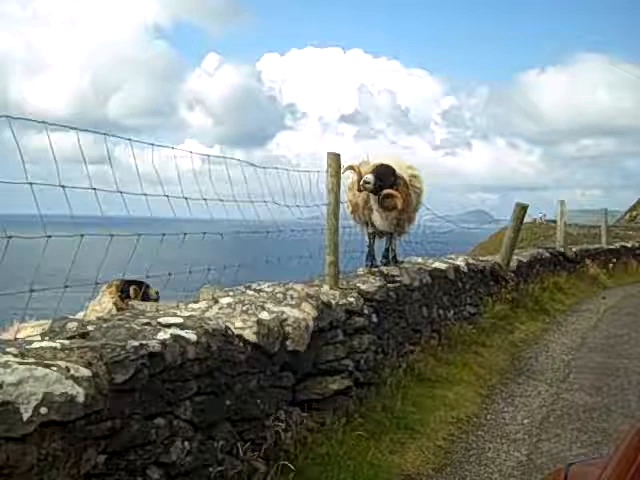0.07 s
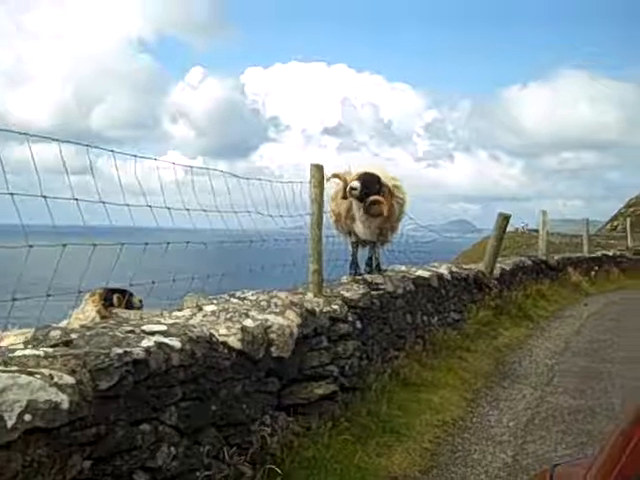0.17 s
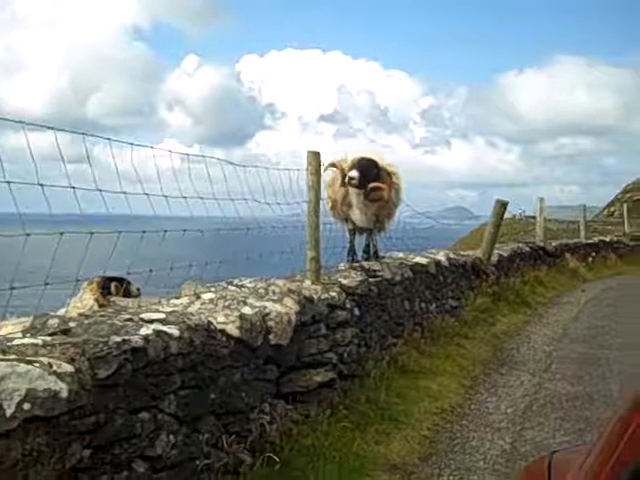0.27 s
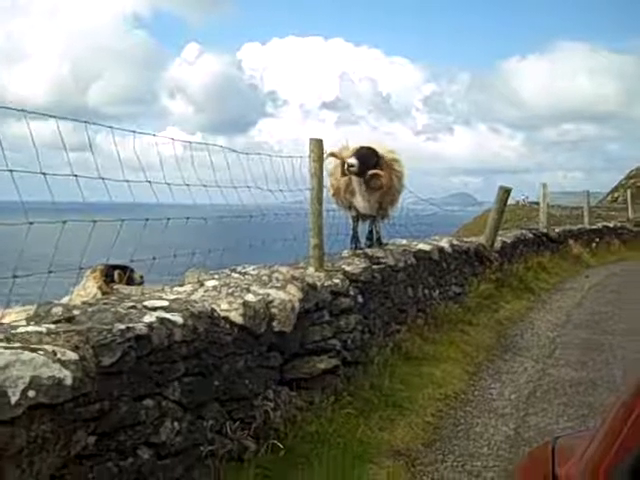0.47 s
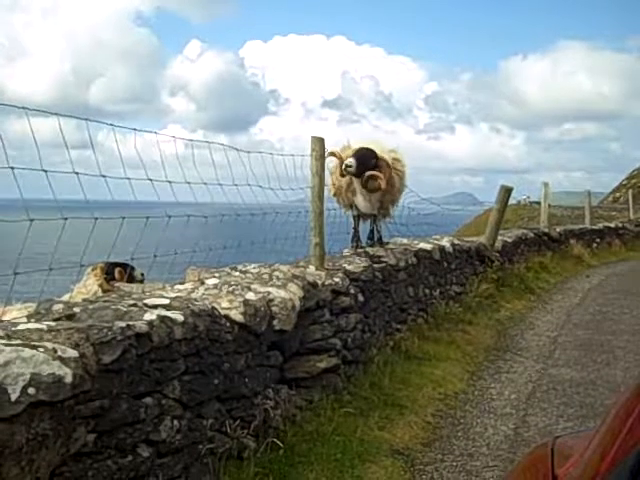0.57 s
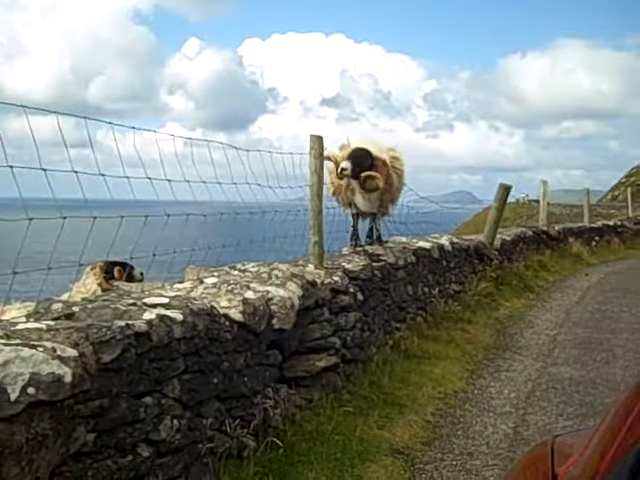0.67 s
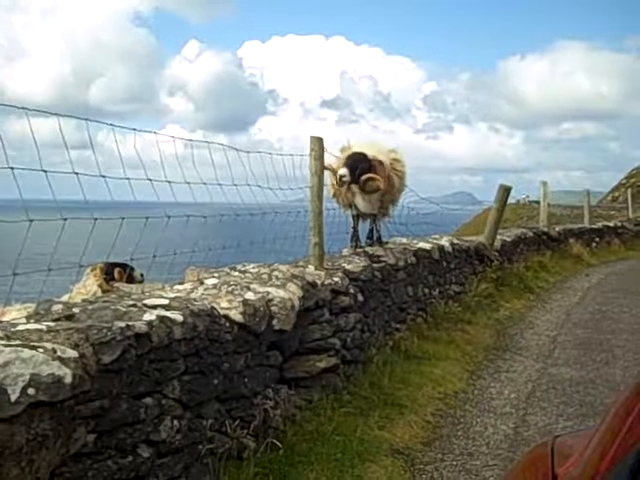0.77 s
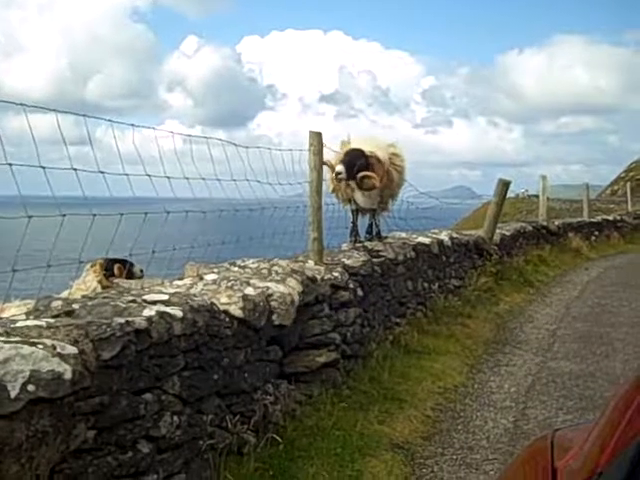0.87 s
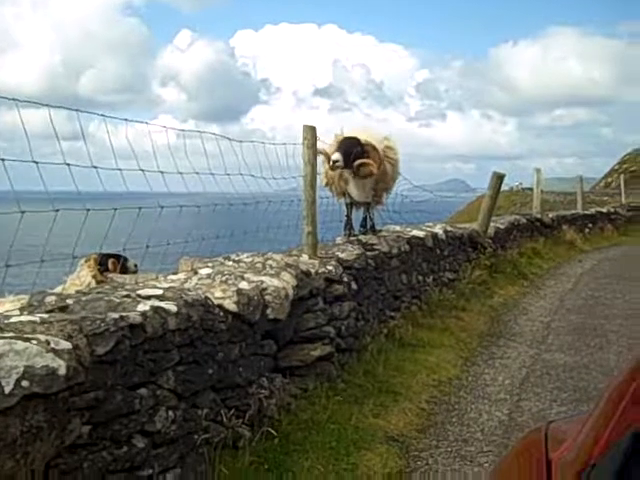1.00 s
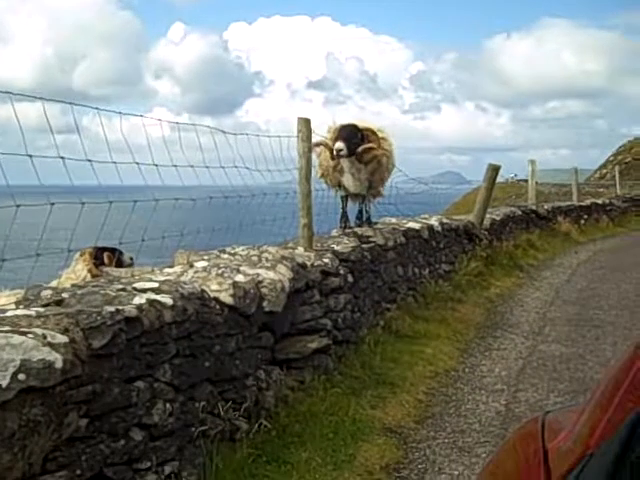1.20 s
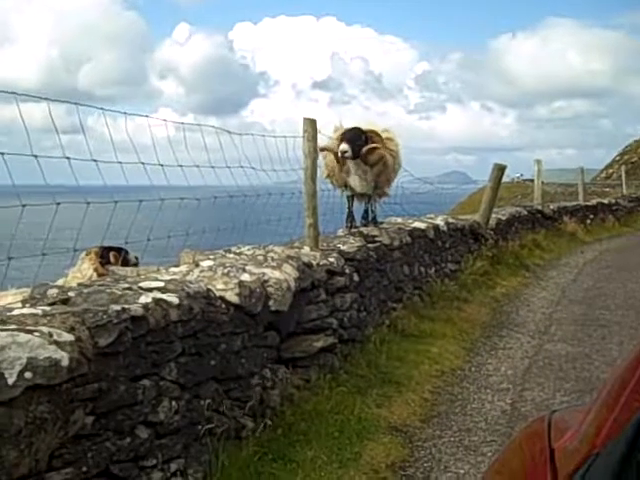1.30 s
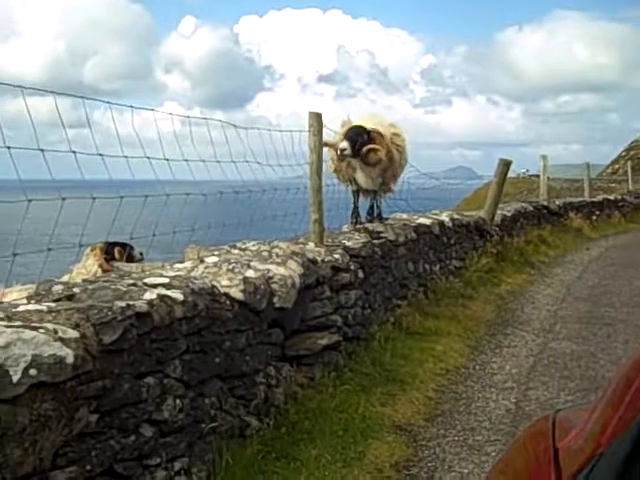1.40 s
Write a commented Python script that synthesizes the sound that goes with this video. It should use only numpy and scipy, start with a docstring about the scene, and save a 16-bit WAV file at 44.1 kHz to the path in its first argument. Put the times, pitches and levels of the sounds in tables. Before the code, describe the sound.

A wire fence ticks briefly as a sheep rubs it, over soft wind and sea.

```python
"""On a road above the sea, heard from a stopped car, a sheep rubs on a wire fence.
The wire slips at its post and rings very briefly, giving three dry ticks.
Small gusts and swirls of air flutter against the microphone, which opens with a soft pop.
Behind them is a steady wash of sea and air, with a faint hum and a faint high chirr."""
import sys
import numpy as np
from scipy import signal
from scipy.fft import rfft, irfft
from scipy.io import wavfile
from scipy.ndimage import uniform_filter1d

SR = 44100
rng = np.random.default_rng(int(sys.argv[2]) if len(sys.argv) > 2 else 0)


def bounce(signal):
    """Save signal as a 16-bit WAV file at the path given by the first command-line argument."""
    frames = np.transpose(np.atleast_2d(signal))
    limited = np.clip(frames, -1, 1)
    pcm = np.round(limited * 32767).astype(np.int16)
    wavfile.write(sys.argv[1], SR, pcm)


N = 63945
T, HZ = np.arange(N) / SR, np.fft.rfftfreq(N, 1 / SR)

# The ticks of the fence. Each row: start in seconds, level in dB, ring time factor, pitch factor,
# treble tilt in dB per octave, scrape level in dB, rebound level in dB.
FENCE_TICKS = [(0.2834, -33.1, 0.42, 0.965, -2.3, -2, -19), (1.163, -36.5, 0.29, 0.93, 1.3, 9.5, -20),
               (1.1859, -28, 0.87, 1, -1.2, -12, -11)]
# The wire's ringing tones, before each tick adjusts them.
# Each row: pitch in Hz, level in dB, seconds to fade by 60 dB.
WIRE_TONES = [(1000, -19, 0.0092), (1450, 0, 0.011), (1650, -13, 0.0078), (2290, -13, 0.018),
              (2580, -5, .0115), (3200, -6.5, 0.012), (4900, -7, 0.01), (5380, -3.5, 0.011),
              (7020, -13, 0.0096), (7290, 3, .0102), (7815, 1.5, 0.0094), (10100, -11.5, 0.0081),
              (12150, -16, .0046), (14700, -17.8, .0048)]
# Swirls of air hitting the microphone. Each row: time in seconds, level in dB, centre pitch in Hz.
AIR_EDDIES = [(0.3133, -39, 179), (0.327, -32, 533), (0.3312, -28, 167), (0.3608, -40, 150),
              (0.3788, -37.5, 155), (0.394, -40, 340), (.4162, -42, 400), (.4545, -40, 150),
              (0.493, -42, 159), (0.5139, -41.5, 175), (.5467, -30.5, 217), (.5535, -35.5, 513),
              (.5718, -31.5, 358), (.5768, -25.5, 490), (.5791, -24.5, 370), (.5828, -45, 420),
              (0.6041, -32, 308), (.6087, -33.5, 480), (0.6132, -28.5, 207), (0.8157, -36.5, 165),
              (0.8553, -28, 215), (0.8676, -32, 710), (0.8741, -49, 178), (.8837, -22.5, 494),
              (.8847, -21.5, 212), (0.8869, -32, 514), (0.9498, -40.5, 166), (0.9841, -44.2, 203),
              (1.1258, -42.5, 259), (1.1477, -41.5, 148), (1.1636, -40, 130), (1.187, -39.5, 137),
              (1.4093, -37.5, 248)]
# Puffs of wind. Each row: peak time, rise and fall in seconds, level in dB, centre pitch in Hz.
WIND_GUSTS = [(.347, 0.02, .031, -45.5, 93), (.487, .04, 0.033, -53.5, 102),
              (.576, .023, 0.034, -42.5, 185), (0.819, 0.01, 0.0082, -45, 125),
              (.867, 0.016, .029, -43.5, 172), (1.152, 0.034, 0.039, -53, 119),
              (1.3, 0.032, 0.037, -57, 78), (1.427, 0.019, 0.021, -53.5, 94)]
# The tone colour of sea and air. Each row: frequency in Hz, relative level in dB.
WASH_SPECTRUM = [(25, -1.5), (100, -2), (200, -2), (360, -3), (800, 0), (1500, -5), (2600, -3.5),
                 (4600, -14), (6300, -13.5), (9000, -16), (12500, -22), (15500, -30.5), (16100, -59)]
# Narrow peaks that make the wash hum. Each row: pitch in Hz, width in Hz, boost in dB.
HUM_PEAKS = [(542, 42, 3), (720, 48, 1.5), (771, 18, 10.5), (920.6, 34.5, 9.5), (1130, 73, 5.5),
             (2198, 63, 4.5), (2597, 22, 5.5)]


def wire_tick(db, ring, pitch, tilt_db, scrape_db, rebound_db):
    """The wire slips with a tiny scrape, rings very briefly and rebounds once."""
    rise_s, scrape_s, rebound_s = 0.00028, 0.00055, 0.0023
    tilt_pivot_hz, scrape_top_hz = 4500, 15400
    t = T[:SR // 20]
    tones = np.zeros(len(t))
    for hz, level, fade_s in WIRE_TONES:
        gain = amp(level + tilt_db * np.log2(hz / tilt_pivot_hz))
        fade = amp(-60 * t / (fade_s * ring))
        tones += gain * fade * np.sin(2 * np.pi * hz * pitch * t)
    hiss = noise(1 / (1 + (HZ / scrape_top_hz) ** 2))[:len(t)]
    scrape = amp(scrape_db) * hiss * np.exp(-t / scrape_s)
    snap = (tones + scrape) * (1 - np.exp(-t / rise_s))
    tick = snap.copy()
    add(tick, rebound_s, amp(rebound_db) * snap)
    return amp(db) * tick


def wind(bass_cut_hz=69):
    """Gusts and their eddies at the microphone, with the deepest bass cut."""
    gusts = sum(gust(*row) for row in WIND_GUSTS)
    eddies = sum(eddy(*row) for row in AIR_EDDIES)
    bass_cut = HZ ** 2 / np.sqrt(HZ ** 4 + bass_cut_hz ** 4)
    return irfft(rfft(gusts + eddies) * bass_cut, N)


def gust(peak_s, rise_s, fall_s, db, centre_hz, lump_db=1.5, lump_hz=92):
    """A lumpy rush of air swells and fades."""
    widths_from_peak = (T - peak_s) / np.where(T < peak_s, rise_s, fall_s)
    swell = np.exp(-widths_from_peak ** 2 / 2)
    lumps = amp(lump_db * noise(np.exp(-(HZ / lump_hz) ** 2)))
    return amp(db) * swell * unit(lumps * turbulence(centre_hz))


def eddy(time_s, db, centre_hz, wake_db=-20.5, wake_s=0.0045):
    """One swirl passes the microphone: a pressure dip, an overshoot and a brief ragged wake."""
    t = T - time_s
    lean = np.exp(0.98j)  # this angle turns an even dip into a dip and an overshoot
    dip = -(lean / (1 - 1j * np.pi * centre_hz * t) ** 3).real
    wake = amp(wake_db) * turbulence(centre_hz) * np.exp(-abs(t) / wake_s)
    return amp(db) * (dip + wake)


def turbulence(centre_hz):
    """Swirling air: a broad hump of noise that dies away above its centre."""
    return noise(HZ * np.exp(-HZ / centre_hz))


def sea_wash(db=-55.5, patch_db=1.78):
    """Sea and air make a steady, faintly humming noise with slightly louder and softer patches."""
    hum_db = sum(boost / (1 + (2 * (HZ - hz) / width) ** 2) for hz, width, boost in HUM_PEAKS)
    steady = noise(amp(read(WASH_SPECTRUM, HZ) + hum_db))
    grid = signal.stft(steady, nperseg=1024, noverlap=768)[2]  # the sound by frequency and time
    patches = rng.standard_normal(grid.shape)
    for axis in (0, 1):  # blur over frequency, then over time
        patches = uniform_filter1d(patches, size=10, axis=axis)
    grid = grid * amp(patch_db * unit(patches))
    air = signal.istft(grid, nperseg=1024, noverlap=768)[1][:N]
    return amp(db) * unit(air)


def chirr(db=-79, pitch_hz=7590, width_hz=180, throb_hz=11.5, throb_db=5.5):
    """A faint, thin, high chirr throbs unevenly, perhaps from insects by the road."""
    throb = amp(throb_db * noise(np.exp(-4 * (HZ / throb_hz - 1) ** 2)))
    thin_hiss = noise(np.exp(-((HZ - pitch_hz) / width_hz) ** 2))
    return amp(db) * unit(throb * thin_hiss)


def amp(db):
    """Turns decibels into a number to multiply by."""
    return 10 ** (np.asarray(db) / 20)


def unit(x):
    """Scales a signal to an average (rms) level of 1."""
    return x / np.sqrt(np.mean(x ** 2) + 1e-20)


def read(points, hz):
    """Fills in the levels between a spectrum's points, spacing octaves evenly."""
    point_hz, level = np.transpose(points)
    return np.interp(np.log(hz + 1), np.log(point_hz), level)


def add(mix, start_s, sound):
    """Adds a sound into the mix at its start time."""
    part = mix[round(start_s * SR):][:len(sound)]
    part += sound[:len(part)]


def noise(gain):
    """Noise at level 1, shaped by a gain for each frequency."""
    return unit(irfft(rfft(rng.standard_normal(N)) * gain, N))


def scene():
    """Mixes the wash, chirr, wind and fence into one channel."""
    mix = sea_wash() + chirr() + wind()
    for start_s, *row in FENCE_TICKS:
        add(mix, start_s, wire_tick(*row))
    return mix[None]


def record(dry):
    """Silence until the microphone opens with a soft pop; the highest treble is cut."""
    open_s, rise_s, pop_db, settle_s, top_hz = 0.1724, 0.0002, -30, 0.11, 16400
    since_open = np.maximum(T - open_s, 0)
    pop = -amp(pop_db) * np.exp(-since_open / settle_s)
    fade_in = 1 - np.exp(-since_open / rise_s)
    treble_cut = signal.firwin(511, top_hz, window=("kaiser", 9), fs=SR)
    return signal.oaconvolve((dry + pop) * fade_in, treble_cut[None], "same")


dry = scene()
out = record(dry)
bounce(out)
```